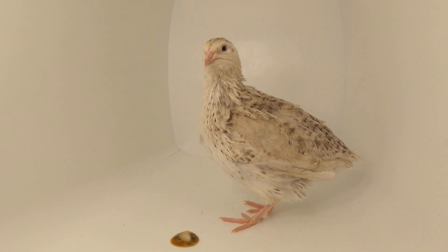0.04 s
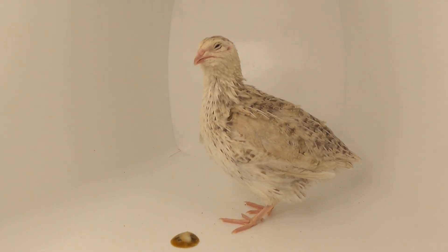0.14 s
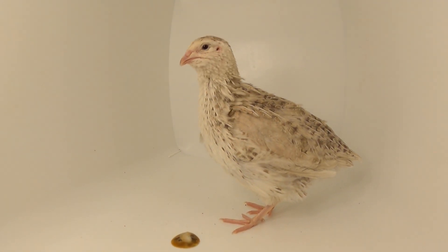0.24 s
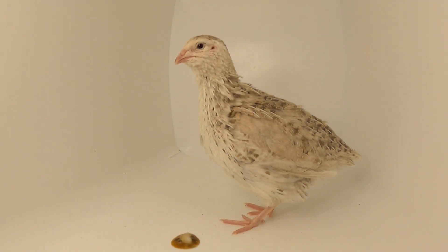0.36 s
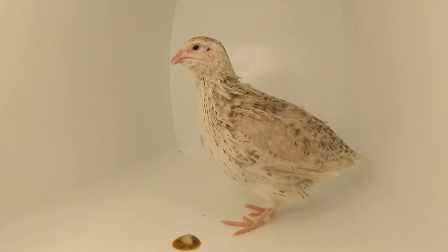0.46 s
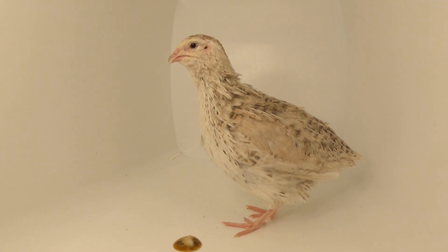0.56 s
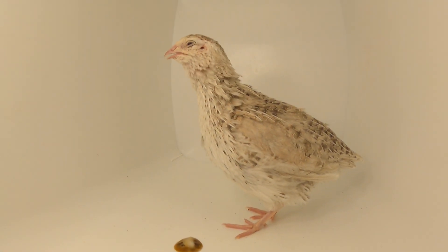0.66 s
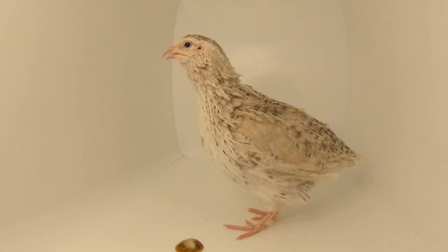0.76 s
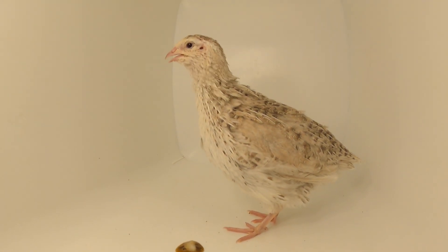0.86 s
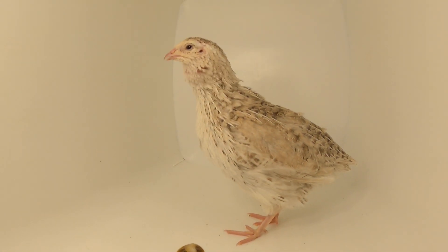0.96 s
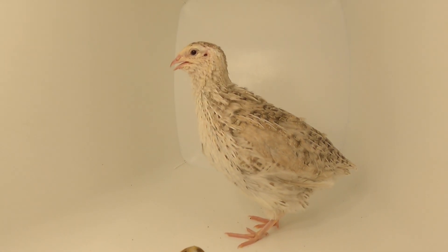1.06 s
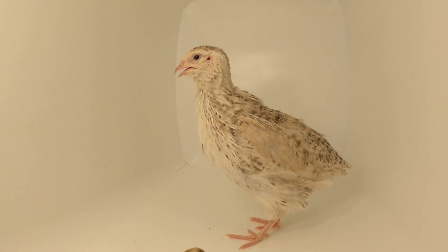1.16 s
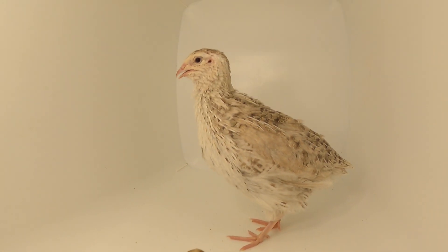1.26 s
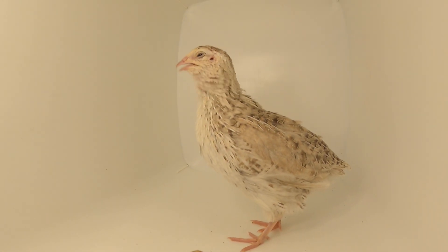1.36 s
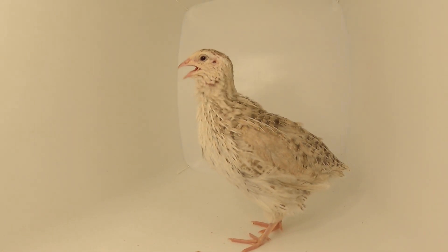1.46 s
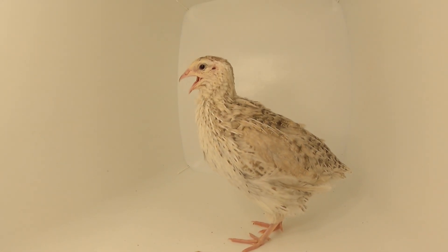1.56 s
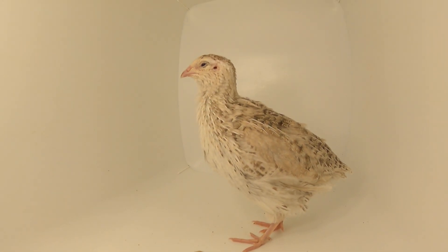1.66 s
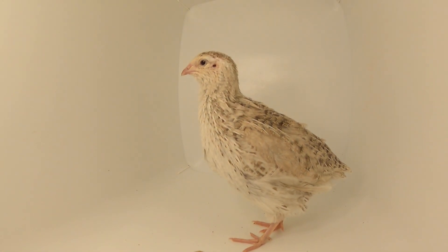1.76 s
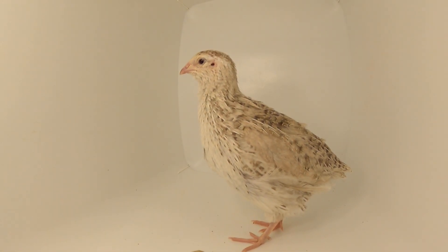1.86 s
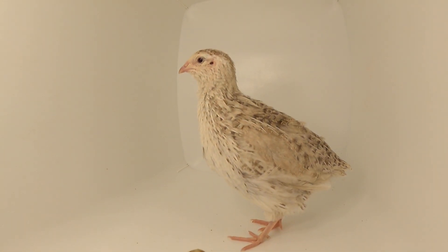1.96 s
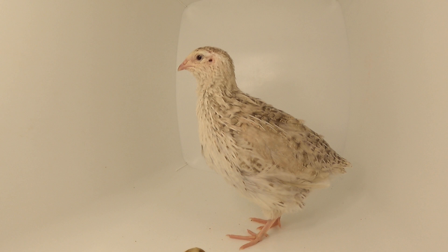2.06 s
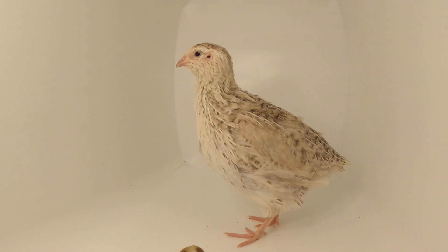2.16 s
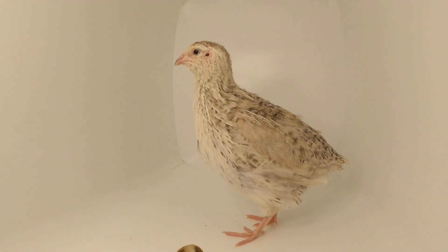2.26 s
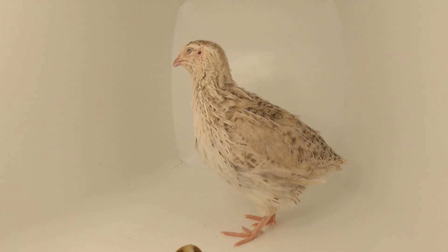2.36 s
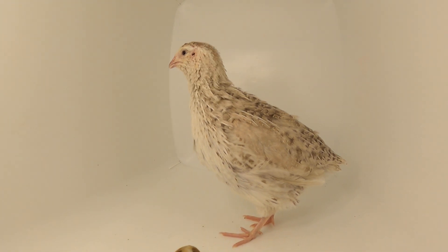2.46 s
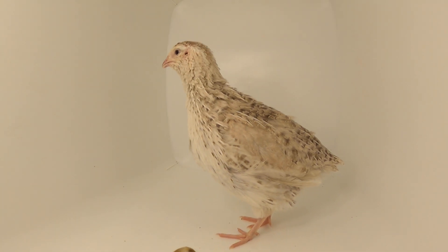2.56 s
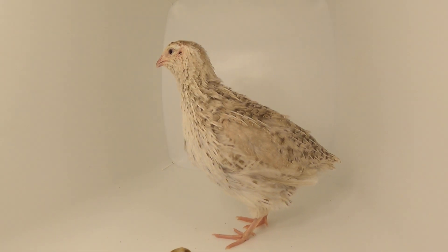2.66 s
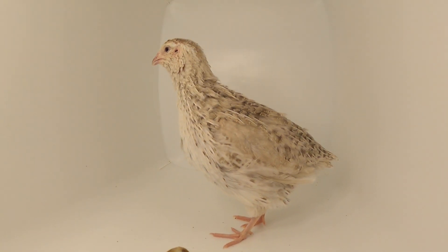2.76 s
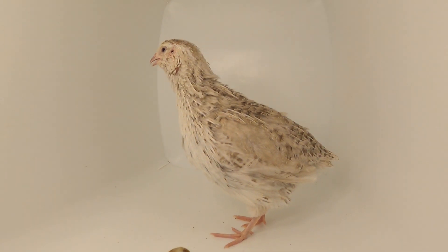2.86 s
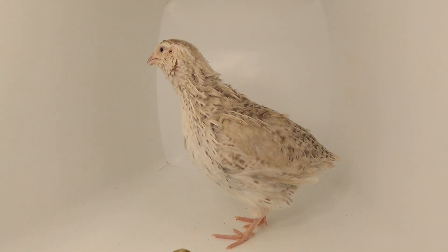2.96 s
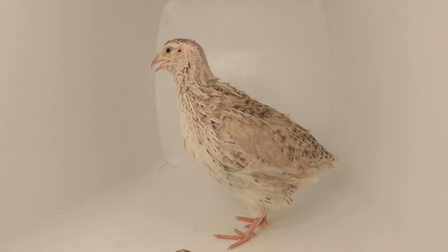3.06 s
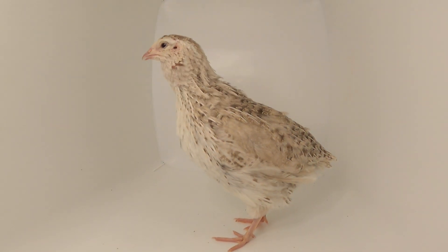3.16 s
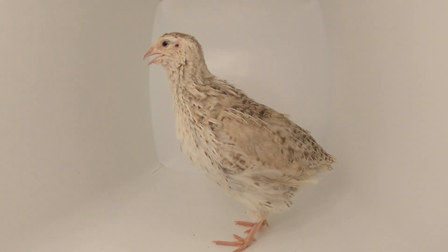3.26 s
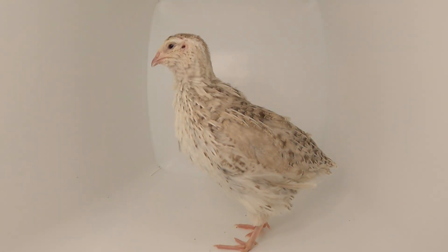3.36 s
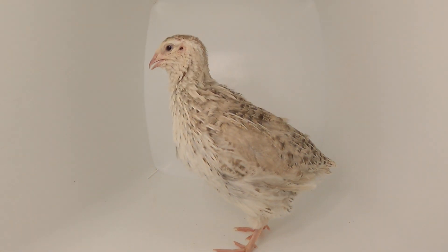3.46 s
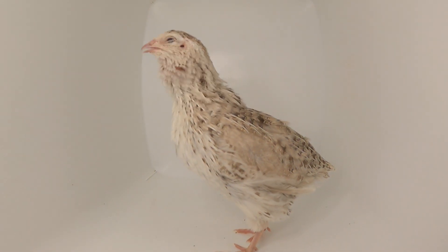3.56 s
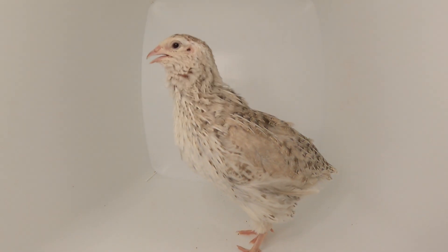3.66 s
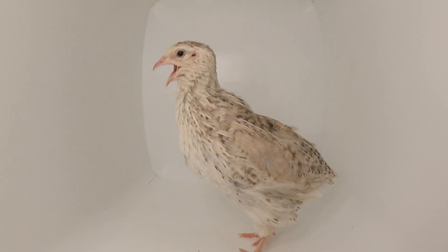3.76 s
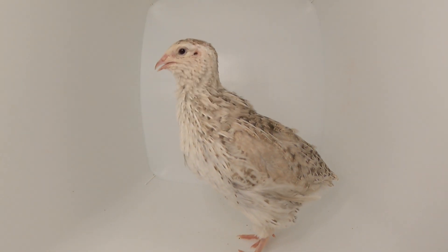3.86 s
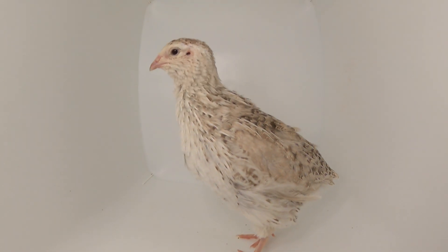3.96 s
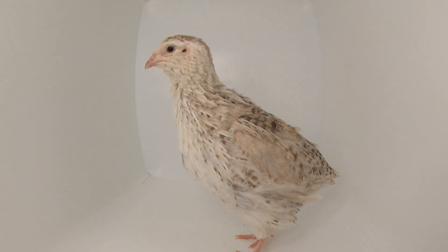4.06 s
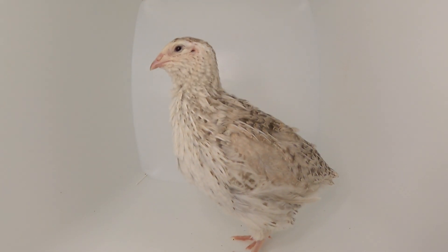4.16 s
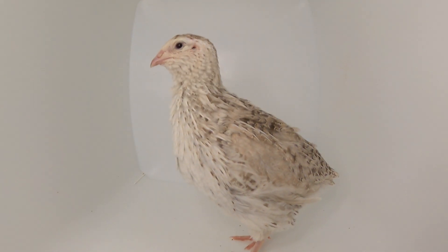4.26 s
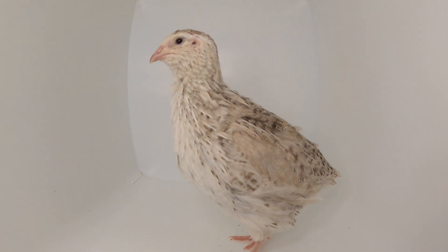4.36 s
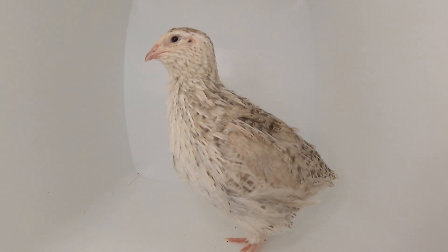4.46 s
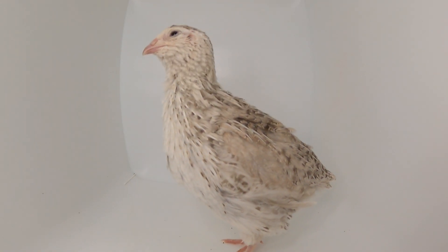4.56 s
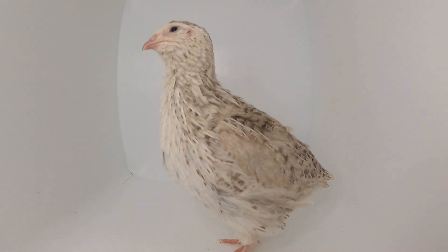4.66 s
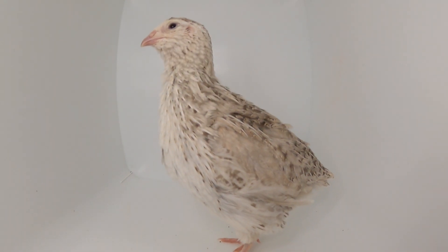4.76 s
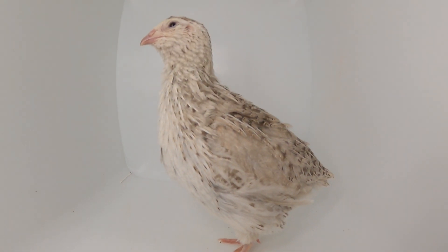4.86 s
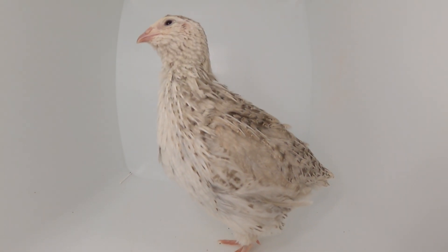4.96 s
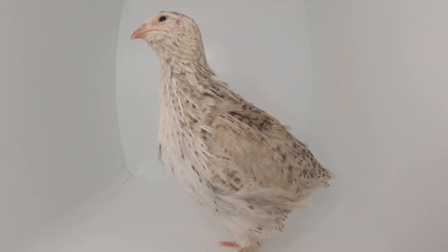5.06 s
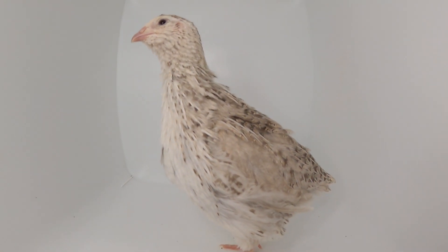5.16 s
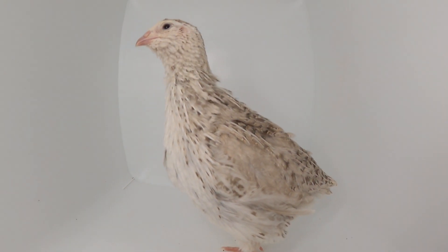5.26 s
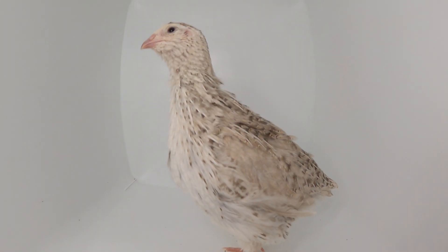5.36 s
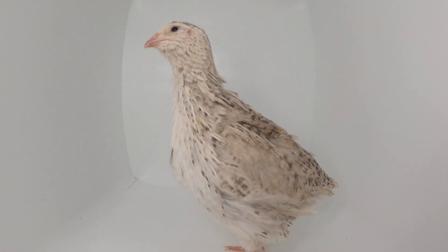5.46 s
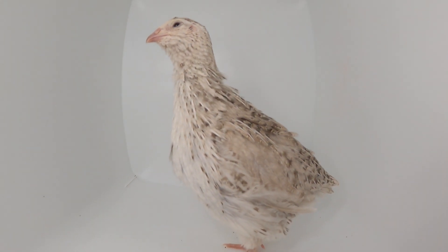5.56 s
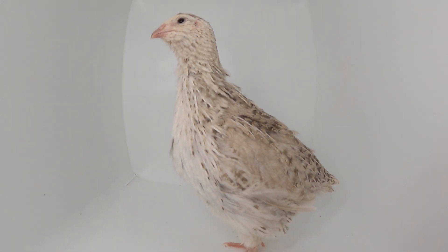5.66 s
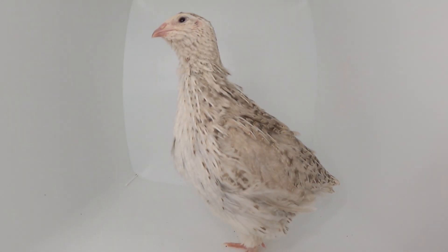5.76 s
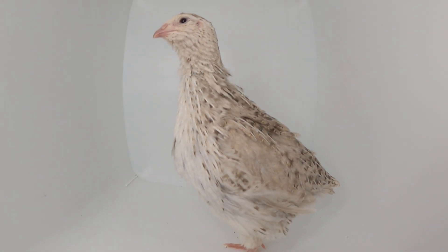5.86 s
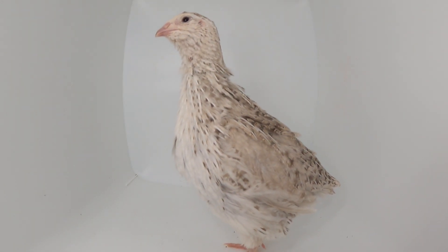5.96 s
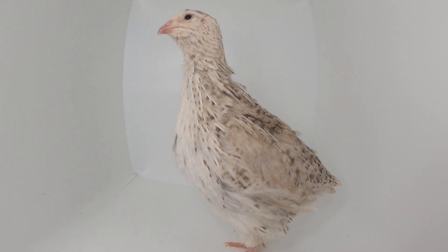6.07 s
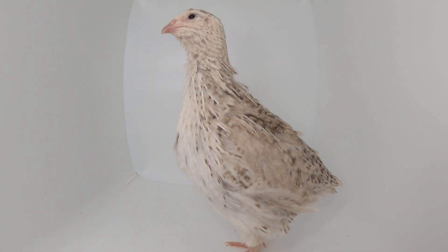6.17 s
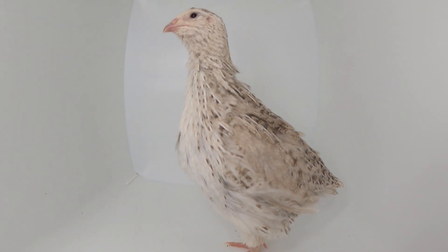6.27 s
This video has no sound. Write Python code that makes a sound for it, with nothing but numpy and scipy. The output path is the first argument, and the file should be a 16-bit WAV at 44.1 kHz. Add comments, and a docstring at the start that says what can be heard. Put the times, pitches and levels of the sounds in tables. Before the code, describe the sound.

Close, boxy quail crows: two clipped notes and a harsh rough trill, repeated once, with small taps on plastic and a distant chick peeping.

```python
"""Quail crowing in a plastic tub

A male quail crows twice in a plastic tub indoors: two sharp notes, then a trill that breaks into a rasp.
Uneven pulses of his syrinx feed a resonance that swoops up and down and bands of coloured sound; the
tub answers with its modes. His claws tap the plastic as decaying noise bursts, and a chick farther off
peeps in gliding partials. Rumble, hum and hiss are coloured noise."""
import sys
import numpy as np
from scipy import signal
from scipy.fft import rfft, irfft, next_fast_len
from scipy.io import wavfile
from scipy.ndimage import uniform_filter1d, minimum_filter1d, map_coordinates

SR = 44100
rng = np.random.default_rng(int(sys.argv[2]) if len(sys.argv) > 2 else 0)


def transcribe(signal):
    """Save signal, clipped to [-1, 1], as a 16-bit WAV file at the path in sys.argv[1]."""
    frames = np.atleast_2d(signal).T
    limited = np.clip(frames, -1, 1)
    pcm = np.round(limited * 32767).astype(np.int16)
    wavfile.write(sys.argv[1], SR, pcm)


N = 278712
TIME = np.arange(N) / SR
REST_HZ = 1220  # the throat resonance at rest

# Course of the room's hiss, which the scuffs share. Each row: time in seconds, level in dB before trim.
HISS_LEVEL = [(0, -57.5), (.5, -62.5), (1, -59.5), (1.7, -72), (1.95, -71), (2.25, -68), (2.6, -66.5),
              (3.1, -60.5), (3.6, -57.5), (4.2, -73.5), (4.7, -74.5), (5.3, -69.5), (5.8, -68.5),
              (6.32, -65.5)]
# Spectrum of claws on plastic. Each row: frequency in Hz, relative density in dB per Hz.
CLAW_SPECTRUM = [(300, -14.5), (700, -7.5), (1050, 4.5), (1500, -3.5), (2100, -8.5), (2700, -8.5),
                 (4000, -10.5), (7000, -25), (10000, -45.5), (15000, -64)]


def amp(db):
    """Decibels to amplitude gain, on the logarithmic level scale."""
    return 10 ** (np.asarray(db) / 20)


def unit(x):
    """Normalise the mean power: x at rms 1."""
    return x / np.sqrt(np.mean(x ** 2) + 1e-20)


def along(points, hz):
    """Interpolate (Hz, value) points on a logarithmic frequency axis, as pitch is heard."""
    f, v = np.transpose(points)
    return np.interp(np.log(hz + 1), np.log(f + 1), v)


def curves(rows, t):
    """Linear interpolation in time: each column after the first, read at times t."""
    s, *cols = np.transpose(rows)
    return [np.interp(t, s, c) for c in cols]


def ramp(t, length):
    """Linear onset: 0 before time 0, rising straight to 1 over length seconds."""
    return np.clip(t / length, 0, 1)


def filtered(x, response):
    """Linear filtering: the spectrum of x times a complex response of frequency."""
    n = x.shape[-1]
    m = next_fast_len(n + 8192)  # padding keeps the tail from wrapping round
    return irfft(rfft(x, m) * response(np.fft.rfftfreq(m, 1 / SR)), m)[..., :n]


def coloured(x, spectrum):
    """Spectral shaping: x weighted by the given spectrum, at rms 1."""
    return unit(filtered(x, lambda hz: amp(along(spectrum, hz))))


def wobble(rate, n):
    """Band-limited random modulation: a smooth curve of n samples through rate random knots a second."""
    knots = rng.standard_normal(int(n * rate / SR) + 4)
    return map_coordinates(knots, [np.arange(n) * rate / SR])


def steady(x, span):
    """Envelope flattening: x divided by its running rms over span seconds."""
    window = np.hanning(max(int(span * SR), 16))
    power = np.abs(signal.fftconvolve(x ** 2, window / window.sum(), 'same'))
    return x / np.sqrt(power + 1e-4 * np.mean(x ** 2))


def pulses(rate, rough, jitter, scatter_db):
    """Pulsed excitation: one impulse per beat; roughness scatters their times and sizes."""
    n = len(rate)
    at = np.flatnonzero(np.diff(np.floor(np.cumsum(rate) / SR)))
    late, size = rng.standard_normal((2, len(at)))
    when = np.clip(at + jitter * rough[at] * late * SR / rate[at], 0, n - 1)
    return np.bincount(when.astype(int), amp(scatter_db * rough[at] * size), n)


def swooping(x, centre_hz, width_hz):
    """Heterodyned resonance: shift the moving centre to zero, apply a double pole, shift back."""
    turn = np.exp(2j * np.pi * np.cumsum(centre_hz) / SR)
    pole = np.exp(-np.pi * width_hz / SR)
    slow = signal.lfilter([1], np.poly([pole, pole]), x / turn)
    return unit((slow * turn).real)


def wash(spectrum, width):
    """Partly correlated stereo noise: a mid signal of rms 1 plus and minus a side share of width."""
    mid, side = coloured(rng.standard_normal((2, N)), spectrum)
    return np.array([mid + width * side, mid - width * side])


def background():
    """Stationary noise under slow modulation: rumble, hum, and a hiss that sinks after each crow."""
    # Spectra. Each row: frequency in Hz, relative density in dB per Hz.
    rumble_spectrum, hum_spectrum, air_spectrum = [(10, -4.5), (25, 4.5), (42, 2.5), (65, -9), (110, -15.5),
                                                   (250, -37), (1500, -92)], [(80, -21), (130, -4.5), (165, 0.5),
                                                                   (200, 1), (240, -1), (300, -17),
                                                                   (600, -24.5), (3000, -81)], [(150, -21.5), (320, -2),
                                                                                (550, -2), (800, -7),
                                                                                (1250, 0), (2000, -5.5),
                                                                                (4000, -13.5), (7000, -18),
                                                                                (9500, -28), (15000, -44.5)]
    # Courses. Each row: time in seconds, level in dB before trim.
    rumble_course, hum_course = [(0, -51.5), (.5, -63), (.9, -74), (1.3, -70), (1.65, -77.5), (2.2, -82.5),
                                 (2.7, -62), (3.6, -63.5), (4.4, -90), (5, -78.5), (5.6, -81.5),
                                 (6.1, -67.5)], [(0, -65.5), (1.1, -62), (1.7, -68.5), (2.1, -77.5),
                                                       (2.4, -72), (3.3, -63.5), (3.95, -68), (4.25, -75),
                                                       (5, -73), (6.1, -64)]
    rumble_db, = curves(rumble_course, TIME)
    hum_db, = curves(hum_course, TIME)
    hiss_db, = curves(HISS_LEVEL, TIME)
    rumble = amp(rumble_db + 5 + 2.2 * wobble(17, N)) * wash(rumble_spectrum, width=0.55)
    rumble = rumble * amp([[2.5], [-2.5]])  # stronger on the left
    hum = amp(hum_db + 2.5 + 2.6 * wobble(16, N)) * wash(hum_spectrum, width=.35)
    hiss = amp(hiss_db - 4 + 3.0 * wobble(16, N)) * wash(air_spectrum, width=.5)
    return rumble + hum + hiss


def room(x):
    """Diffuse reverberation: convolution with noise whose frequencies each decay at their own speed."""
    # Reverberation time. Each row: frequency in Hz, time to fall by 60 dB in seconds.
    decay_times = [(200, 0.27), (1500, 0.3), (5000, 0.29), (12000, 0.085)]
    hz, t, z = signal.stft(rng.standard_normal((2, SR // 2)), SR, nperseg=256)
    decay = amp(-60 * t / along(decay_times, hz)[:, None])
    mid, side = signal.istft(z * decay, SR, nperseg=256)[1]
    tail = np.array([mid + .5 * side, mid - .5 * side])
    return signal.fftconvolve(x, tail / np.linalg.norm(tail[0]), axes=1)[:, :N]


def walls(x, t60=.045):
    """Early reflections between plastic walls: short decaying noise, alike in both channels at long waves."""
    t = np.arange(SR // 10) / SR
    mid, side = rng.standard_normal((2, len(t))) * amp(-60 * t / t60) * (t > .001)
    side = filtered(side, lambda f: 0.6 * f ** 2 / (f ** 2 + 1200 ** 2))
    echo = np.array([mid + side, mid - side]) / np.linalg.norm(mid)
    return signal.fftconvolve(x[None], echo, axes=1)[:, :N]


def tub(x, lag_s=.000024, skew_rad=0.77):
    """Modal superposition: direct sound plus air modes of unequal level and phase in the two channels."""
    # Air modes. Each row: frequency in Hz, width in Hz, level over the direct sound in dB, left-right dB.
    air_modes = [(1170.3, 24, 11.5, 3.5), (1462, 39, 6, 1.5), (1684, 18, 3.5, 0), (1882, 37, -0.5, 1),
                 (2027, 27, 5, -1), (2270, 23, 1, 2), (2286, 38, -2.5, 2.5), (2575, 32, 1, 1),
                 (2692, 44, 4, 7), (3170, 19, 7.5, 2.5), (3443, 15, 2.5, 5.5), (3960, 30, 0, 1),
                 (3850, 33, -5.5, -3.5), (4335, 35, 6.5, -2.5), (4610, 55, 3, -6)]
    # Stereo balance. Each row: frequency in Hz, left-right difference in dB.
    balance = [(500, 0.5), (1200, -2), (2700, 3), (4500, 2), (8000, 3), (13000, -3)]
    side = np.array([[.5], [-.5]])

    def modes(f):
        """Second-order resonances in parallel, each peaking at its own frequency."""
        return sum(amp(db + pan_db * side) * 1j * f * w / (c * c - f * f + 1j * f * w)
                   for c, w, db, pan_db in air_modes)

    def lean(f):
        """Interchannel differences of level and arrival time."""
        return amp(along(balance, f) * side) * np.exp(-2j * np.pi * f * lag_s * side)

    return filtered(x, lambda f: 0.46 * (1 + modes(f) * np.exp(-1j * skew_rad * side)) * lean(f))


def chick(waver=.004, tremble=0.0048, first_db=-15, third_db=-28):
    """Harmonic synthesis: thin falling whistles, a strong second partial between two weak ones."""
    # Peeps, pitched by the second partial. Each row: start and end in seconds, first, held and last
    # pitch in Hz, level in dB before trim.
    peep_rows = [(0.18, 0.433, 5150, 4900, 4700, -57), (0.862, 1.063, 5100, 4960, 4690, -55),
                 (1.603, 1.796, 5100, 4930, 4790, -62), (2.261, 2.502, 5120, 4960, 4740, -57),
                 (2.945, 3.193, 4900, 4690, 4500, -63), (3.579, 3.748, 4920, 4780, 4700, -64),
                 (4.361, 4.59, 4640, 4480, 4210, -61.5), (5.019, 5.241, 4640, 4410, 4204, -57),
                 (5.733, 5.982, 4600, 4390, 4310, -50.5)]
    sink_hz, settled, step_at = 50, .25, 0.58  # sinks this far between these shares of its length
    out = np.zeros(N)
    for start, end, first_hz, held_hz, last_hz, db in peep_rows:
        span = (TIME > start) & (TIME < end)
        u = (TIME[span] - start) / (end - start)
        # Each peep drops onto its pitch, sinks, steps down once more, and quavers on the way.
        stations_hz = [first_hz, held_hz + sink_hz / 2, held_hz - sink_hz / 2, last_hz]
        glide = np.interp(u, [0, settled, step_at, 1], stations_hz)
        hz = glide * (1 + waver * wobble(45, len(u)) + tremble * wobble(400, len(u)))
        phase = np.pi * np.cumsum(hz) / SR  # of the first partial, at half the pitch
        first = amp(first_db + 4.3 * wobble(25, len(u))) * np.sin(phase)
        partials = first + np.sin(2 * phase) + amp(third_db) * np.sin(3 * phase)
        envelope = np.abs(np.sin(np.pi * u)) ** .9
        out[span] += amp(db + 2.3 * wobble(60, len(u))) * envelope * partials
    return out


def shuffles(rate=18, life_s=0.026, spread_db=3):
    """Random (Poisson-like) impacts: small decaying scuffs of feet and feathers, rate a second."""
    level_db, = curves(HISS_LEVEL, TIME)
    sizes = amp(spread_db * np.minimum(rng.standard_normal(N), 1))
    scuffs = (rng.random(N) < rate / SR) * sizes
    swell = unit(signal.lfilter([1], [1, -np.exp(-1 / (life_s * SR))], scuffs))
    return amp(level_db - 6.5) * swell * coloured(rng.standard_normal(N), CLAW_SPECTRUM)


def claws(t60=0.084, settle_t60=.2, thud_t60=0.25, scratch_t60=.13, attack_s=0.00069):
    """Impact excitation: each step ticks, scratches and thuds as exponentially decaying noise."""
    # Steps. Each row: time in seconds, level of the step, then of its thud and scratch within it,
    # in dB before trim.
    steps = [(0.14, -42, -12, -18), (0.316, -54, 9.5, -27), (0.372, -45.5, 2.5, -12),
             (0.546, -49.5, -17, -34), (0.643, -40.5, -26, -14), (0.877, -40, -5, -27),
             (0.963, -50.5, -8, -30), (1.862, -53.5, -4, -13), (2.114, -45.5, -39, -11.5),
             (2.767, -60, -9.5, 6), (2.863, -49.5, -13.5, -16), (2.934, -49, -12, -28.5),
             (2.987, -37, -29, -25), (3.013, -43, -25.5, -11.5), (3.045, -46, -14, -26),
             (4.355, -54.5, -16, -21), (4.523, -48, -31.5, -32), (4.627, -58.5, 6, -33.5),
             (5.27, -47.5, -22.5, -21), (5.304, -58.5, -14, -4), (5.376, -54.5, 6, -35),
             (5.41, -62, 8.5, -25.5), (5.573, -46, -9.5, -38), (6.171, -53, 1, -31.5)]
    # Spectra. Each row: frequency in Hz, relative density in dB per Hz.
    thud_spectrum, scratch_spectrum = [(50, -17), (150, -2.5), (240, 1), (500, -7), (1200, -21),
                                       (5000, -83.5)], [(2000, -14.5), (4500, -2), (6800, -3.5), (7900, 0),
                                                     (8800, -9.5), (11000, -19), (15000, -52.5)]
    out, t = np.zeros(N + SR), np.arange(SR // 4) / SR
    for s, db, thud_db, scratch_db in steps:
        tick, thud, scratch = rng.standard_normal((3, len(t)))
        # A sharp tick, then the toe settles more softly.
        step = (amp(-11.5 - 60 * t / t60) + amp(-14 - 60 * t / settle_t60)) * coloured(tick, CLAW_SPECTRUM)
        step += amp(thud_db - 2.5 - 60 * t / thud_t60) * coloured(thud, thud_spectrum)
        step += amp(scratch_db - 60 * t / scratch_t60) * coloured(scratch, scratch_spectrum)
        out[round(s * SR):][:len(t)] += amp(db) * step * (1 - np.exp(-t / attack_s))
    return out[:N]


def throbs(width_s=0.024):
    """Gaussian tone bursts: a few soft low cycles as the voice runs down."""
    # Each row: time of the middle in seconds, frequency in Hz, peak level in dB.
    bursts = [(1.11, 285, -52.5), (1.84, 109.4, -51), (3.28, 302, -55), (4.04, 270, -56),
              (4.12, 112.3, -51.5)]
    return sum(amp(db) * np.exp(-((TIME - s) / width_s) ** 2) * np.sin(2 * np.pi * hz * TIME)
               for s, hz, db in bursts)


def swoops(t):
    """Formant motion: resonance height above rest (Hz) and lifts of ring and rasp (dB) in each swoop."""
    # Swoops; the last of each crow is held as the rasp. Each row: time at the top in seconds, top in Hz,
    # rise, hold and fall in seconds, ring lift and rasp lift in dB.
    swoop_rows = [(1.055, 1858, .014, .008, 0.013, 7, -3.5), (1.251, 2060, .008, .008, .018, 2, -2.5),
                  (1.491, 2797, .028, .006, .019, 2, 4), (1.54, 2902, .012, .007, .025, 4.5, -4.5),
                  (1.592, 2750, .021, .008, .021, 5, 3), (1.638, 2936, .016, .087, .035, -1.5, -0.5),
                  (3.245, 1840, .014, .008, 0.0093, 3.5, 0), (3.45, 2812, .012, 0.0033, .017, 5.5, -2.5),
                  (3.683, 3135, .019, .003, .016, 0.5, 0), (3.733, 3066, .010, 0.0088, .022, -4, -6.5),
                  (3.779, 3207, .010, 0.0068, 0.035, 2.5, -2), (3.833, 3136, .015, .015, .054, 0, -7),
                  (3.897, 3136, 0.039, .068, .105, -2.5, -3)]
    height, ring_lift, rasp_lift = np.zeros((3, len(t)))
    for s, top_hz, rise, hold, fall, ring_db, rasp_db in swoop_rows:
        opening = ramp(t - s + rise, rise) * ramp(s + hold + fall - t, fall)
        shape = np.sin(np.pi / 2 * opening) ** 2
        height = np.maximum(height, shape * (top_hz - REST_HZ))
        ring_lift += shape * ring_db
        rasp_lift += shape * rasp_db
    return height, ring_lift, rasp_lift


def note(start, end, ring_db, buzz_db, throat_db, fizz_db, fade, fade_db, pulse_hz, roughness,
         attack=.005, release=0.01, chest_db=-52):
    """Source and filter: syrinx pulses sound a swooping ring, a broad buzz and, under strain, a high rasp."""
    # Voice colours. Each row: frequency in Hz (the rasp's before tension), relative density in dB per Hz.
    buzz_spectrum, rasp_spectrum = [(100, -60.5), (340, -39), (430, -25), (490, -8.5), (620, -7), (900, 1),
                                    (1300, 7.5), (2000, 2), (2900, -10.5), (3500, -25.5), (4500, -41.5),
                                    (6000, -55.5), (12000, -90)], [(1500, -40.5), (2800, -3), (3500, 0), (4600, -1),
                                                  (5000, -6), (5500, -22.5), (7000, -30), (9000, -45),
                                                  (15000, -54.5)]
    fizz_spectrum, throat_spectrum = [(2000, -31), (4000, -5.5), (5500, -1.5), (7000, 1), (8500, -9.5),
                                      (10500, -25.5), (15500, -29)], [(130, -45), (250, -22), (400, -15), (540, -9), (880, 2),
                                                    (1100, -10), (1800, -59.5)]
    # The syrinx is drawn tighter for the second crow.
    # Each row: time in seconds, factor on the rasp's frequencies.
    tension_course = [(1.5, 0.91), (3.6, 0.96)]
    onset_hz, onset_s = 616, 0.006  # each note drops onto the resonance from a little above
    strained_hz = 3185  # the resonance at full strain
    strain_pitch, strain_rough = .3, 0.16  # strain speeds the syrinx by this share and roughens it
    sag, sag_s = .22, .04  # share by which the syrinx slows over the end of a note
    stall, stall_s = 0.32, .012  # and it stalls in the very last moment
    swell_db, swell_s = 9, 0.0061  # every note swells in
    clear_s, clear_fade_s = 3.972, 0.017  # from here on the voice clears, within this time
    clear_share = .8  # share of the roughness that goes

    span = (TIME > start - attack) & (TIME < end + release)
    t = TIME[span]
    age, left = t - start, end - t
    # The higher the swoop, the more he strains: that sets pitch, roughness and the balance of the layers.
    height, ring_lift, rasp_lift = swoops(t)
    strain = height / (strained_hz - REST_HZ)
    clear = ramp(t - clear_s, clear_fade_s)
    ring_hz = REST_HZ + height + onset_hz * np.exp(-np.maximum(age, 0) / onset_s)
    rate = pulse_hz * (1 + strain_pitch * strain)
    rate = rate * (1 - sag * ramp(sag_s - left, sag_s)) * (1 - stall * ramp(stall_s - left, stall_s))
    rough = (roughness + strain_rough * strain) * (1 - clear_share * clear)

    # Levels in dB: strain moves the balance, and a long note tires by so many dB per second of age.
    effort_db = -swell_db * ramp(swell_s - age, swell_s) - fade_db * ramp(fade - left, fade)
    flank_db = 3 * np.sin(np.pi * strain)  # the ring gains most halfway up a swoop
    ring_db = ring_db + 1.5 + effort_db + ring_lift - 6 * strain + flank_db - 19.5 * age - 4.5 * clear
    buzz_db = buzz_db + effort_db - 3.5 * strain - 2 * age
    rasp_db = -42.5 + effort_db + rasp_lift + 23.5 * strain ** 1.2 - 23 * clear  # the power delays its rise
    fizz_db = fizz_db + effort_db - 20 * age + 8 * strain - 12 * clear
    throat_db = throat_db + effort_db / 2 - 99.5 * age  # the low end goes first

    tension, = curves(tension_course, start)
    beats = pulses(rate, rough, jitter=0.44, scatter_db=4)
    # Each opening lets through a short puff of turbulent air, dying within about 1 ms.
    flow = signal.lfilter([1], [1, -np.exp(-1 / (0.001 * SR))], beats)
    puffs = unit(flow * rng.standard_normal(len(t)))
    source = unit(beats) + .55 * rough * puffs
    ring = amp(ring_db) * steady(swooping(source, ring_hz, width_hz=460), span=0.0039)
    # A rough syrinx makes the ring flutter; the ring keeps no bass below about 600 Hz.
    ring = ring * amp(rough * (9 * wobble(300, len(t)) + 0.5))
    ring = filtered(ring, lambda hz: hz ** 8 / (hz ** 8 + 620 ** 8))
    buzz = amp(buzz_db) * steady(coloured(source, buzz_spectrum), span=0.042)
    tight_spectrum = np.array(rasp_spectrum) * [tension, 1]
    rasp = amp(rasp_db) * steady(coloured(source, tight_spectrum), span=0.023)
    fizz = amp(fizz_db) * coloured(source * amp(5.0 * wobble(160, len(t))), fizz_spectrum)
    throat = amp(throat_db) * coloured(source, throat_spectrum)
    # The bare fundamental shows as the syrinx slows at the end of a note.
    chest = amp(chest_db) * np.sin(2 * np.pi * np.cumsum(rate) / SR)
    gate = ramp(age + attack, attack) * ramp(left + release, release)
    out = np.zeros(N)
    out[span] = gate ** 2 * (ring + buzz + rasp + fizz + throat) + gate * chest
    return out


def scene():
    """Superposition of sound paths: quail and claws inside the tub, the chick out in the room."""
    # Each crow is two short notes and a long one. Each row: start and end in seconds, base levels of ring,
    # buzz, throat and fizz in dB, fade in seconds, fade depth in dB, unstrained pulse rate in Hz,
    # unstrained roughness from 0 to 1.
    crow_notes = [ (1.031, 1.113, -23, -15, -29.5, -47, .045, 21.8, 569.6, 0.19),
                  (1.224, 1.285, -16.5, -17, -28, -51.5, .02, 20, 582.5, .28),
                  (1.449, 1.75, -20.5, -19.5, -31, -57.5, .02, 19, 545.2, .4),
                  (3.218, 3.292, -19.5, -13.5, -33, -47, 0.051, 20, 578.4, .24),
                  (3.411, 3.484, -18, -18.5, -37.5, -48.5, 0.015, 15, 568.2, .28),
                  (3.644, 4.034, -15.5, -21.5, -39, -53.5, .025, 14, 550.4, .32)]
    near = sum(note(*row) for row in crow_notes) + claws() + shuffles()
    inside = tub(near) + amp(-13.5) * walls(near)
    # The mouth of the tub sends mostly the middle of the voice out into the room (Hz, dB).
    mouth = [(300, -7.5), (1000, -3.0), (1600, -1.0), (2500, -7.0), (5000, -10.0)]
    spill = filtered(near, lambda hz: amp(along(mouth, hz))) * np.ones((2, 1))
    peeps = chick() * np.ones((2, 1))
    quail = inside + amp(-22.5) * room(spill)
    far = amp(-3.5) * peeps + amp(-3.0) * room(peeps)
    return quail + far + throbs() + background()


def record(dry):
    """Peak limiting and band limiting: gain dips around the loudest peaks, nothing stays above 15.7 kHz."""
    needed = np.minimum(1, .55 / (np.abs(dry).max(axis=0) + 1e-9))
    gain = uniform_filter1d(minimum_filter1d(needed, size=260), size=220)  # sizes in samples
    return filtered(dry * gain, lambda hz: hz < 15700)


dry = scene()
out = record(dry)
transcribe(out)
```